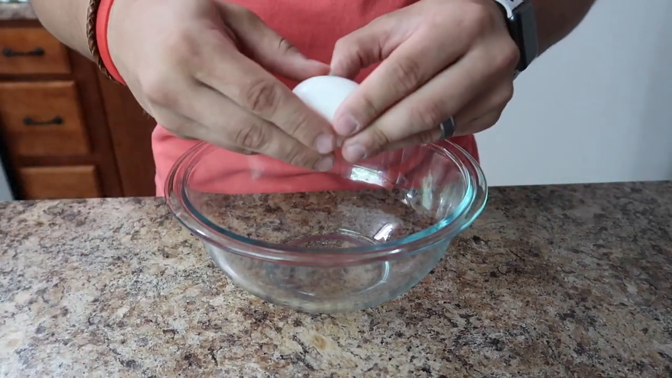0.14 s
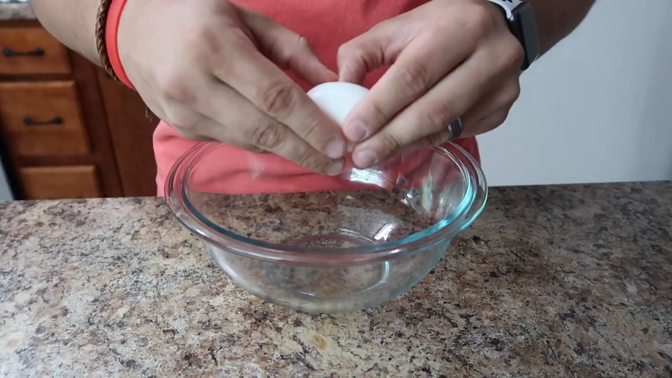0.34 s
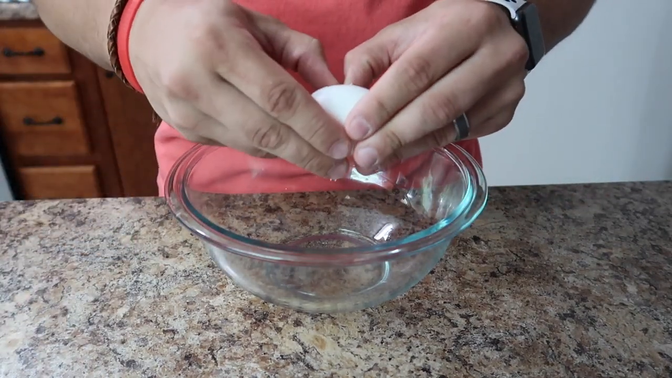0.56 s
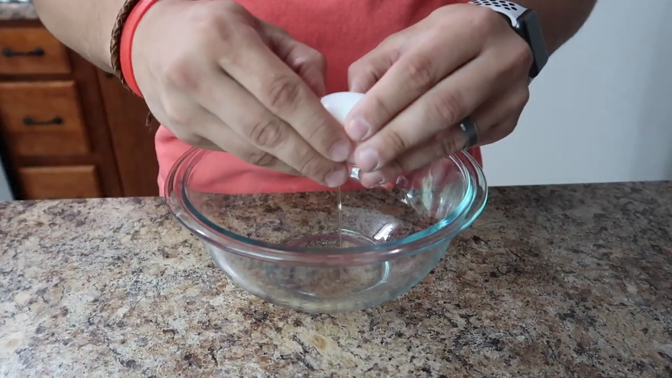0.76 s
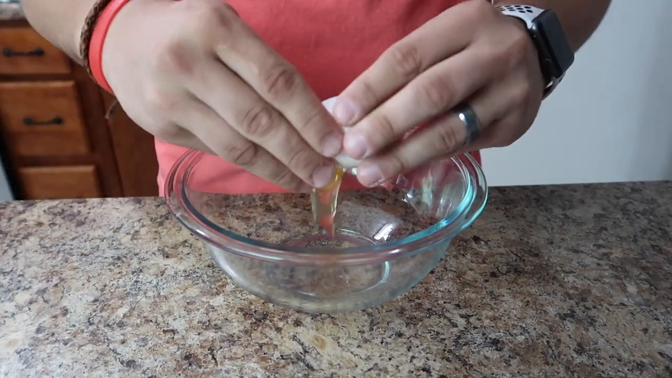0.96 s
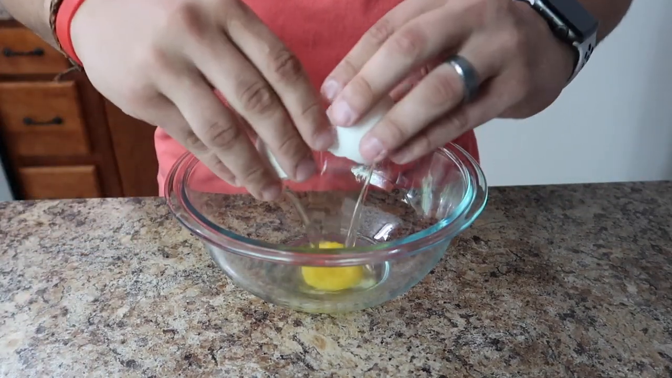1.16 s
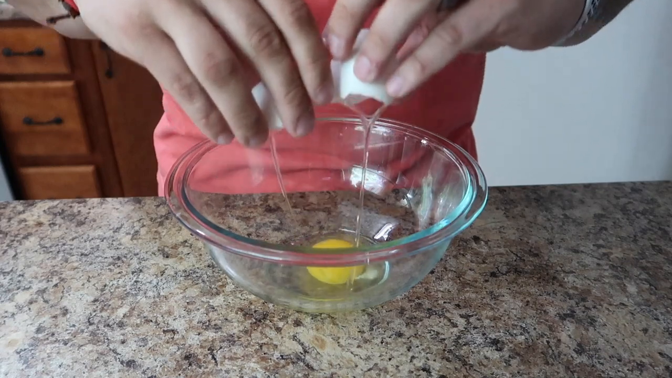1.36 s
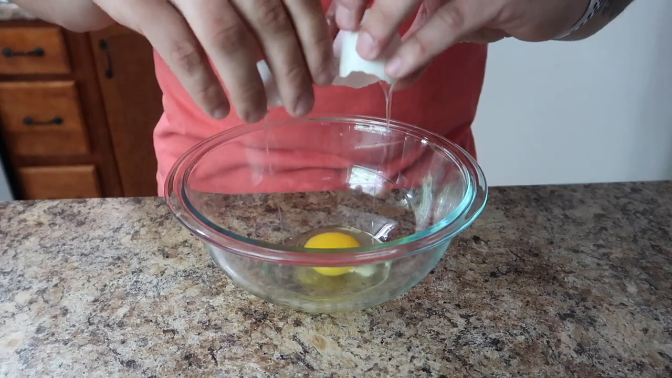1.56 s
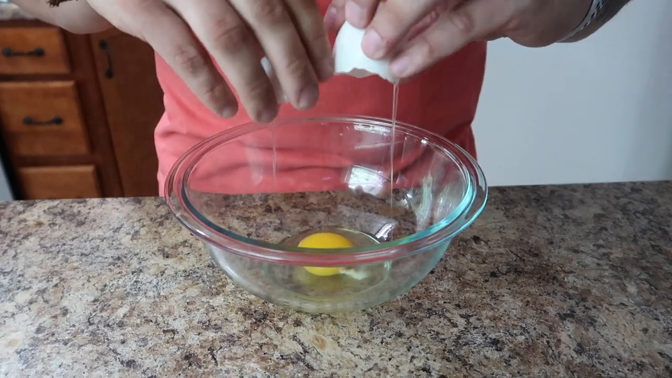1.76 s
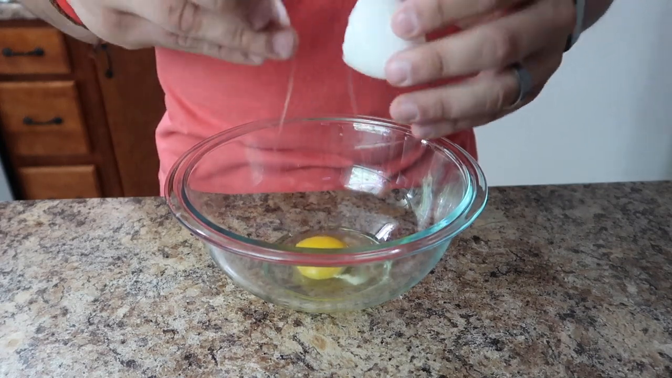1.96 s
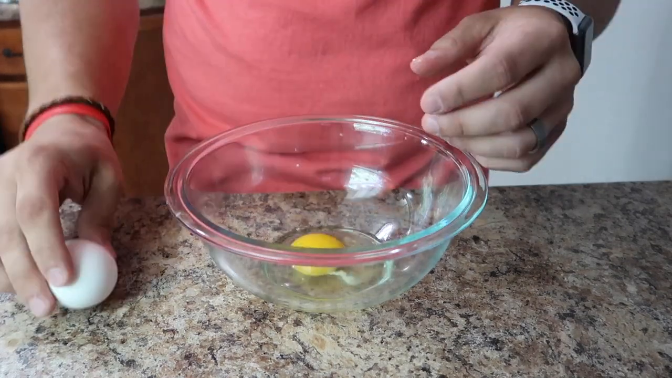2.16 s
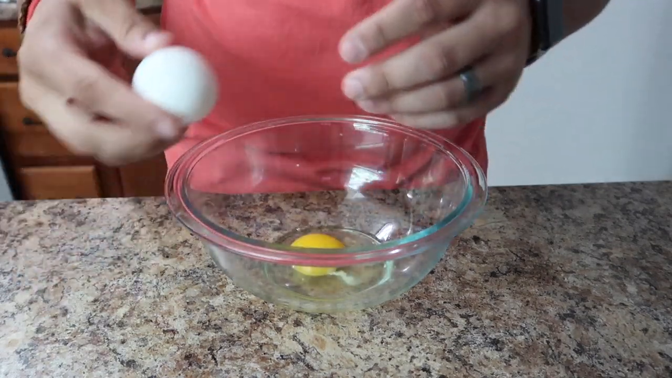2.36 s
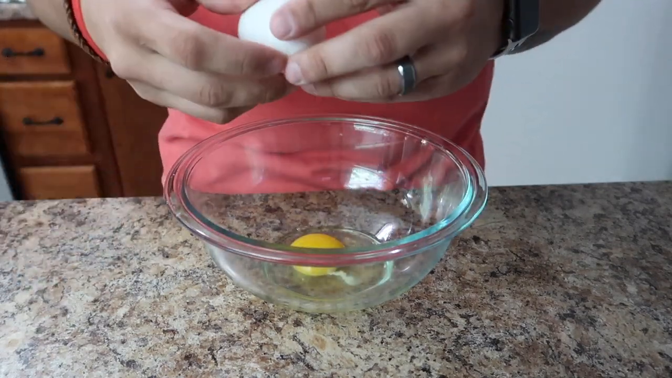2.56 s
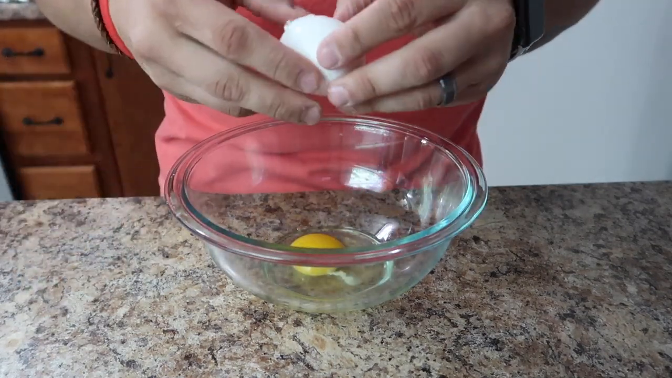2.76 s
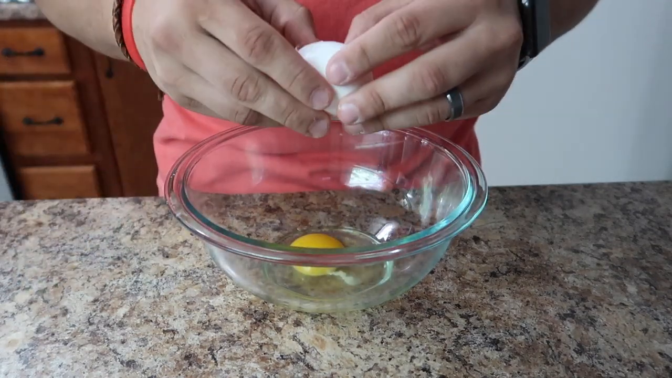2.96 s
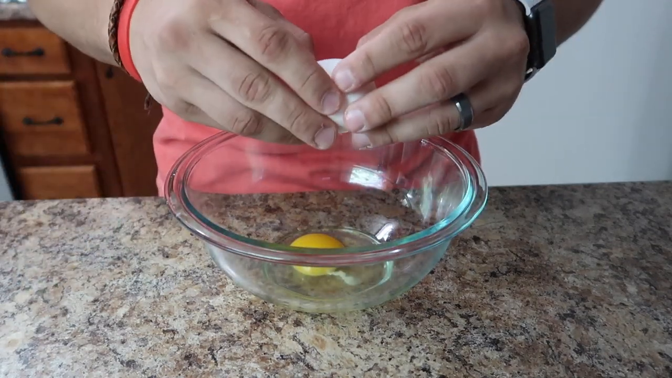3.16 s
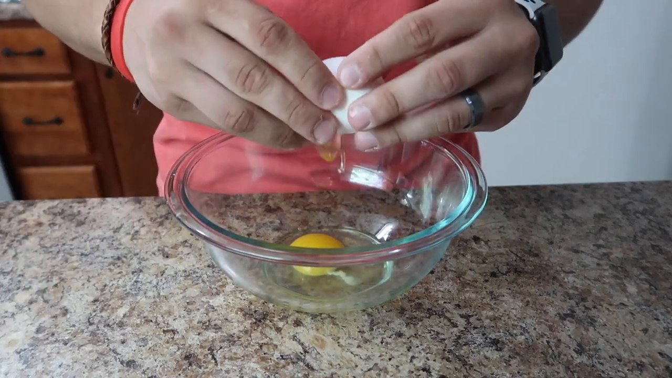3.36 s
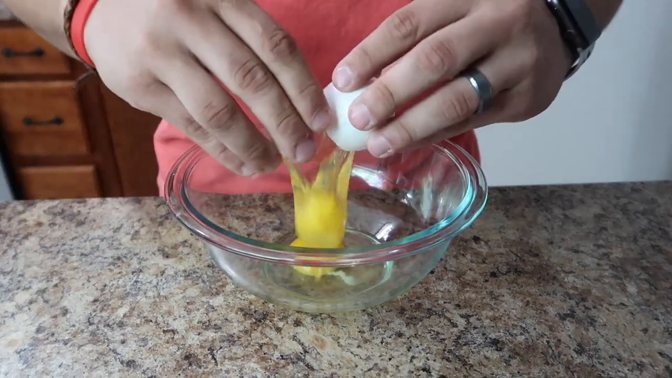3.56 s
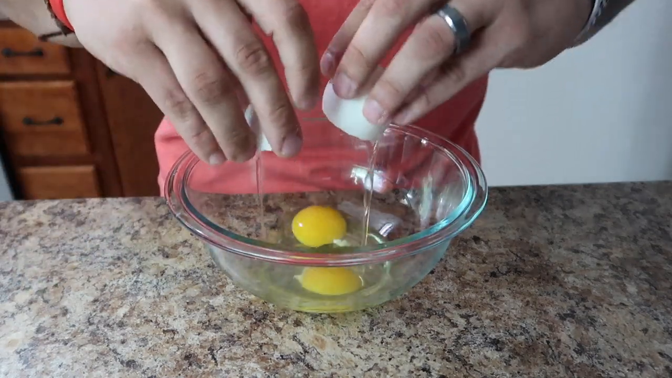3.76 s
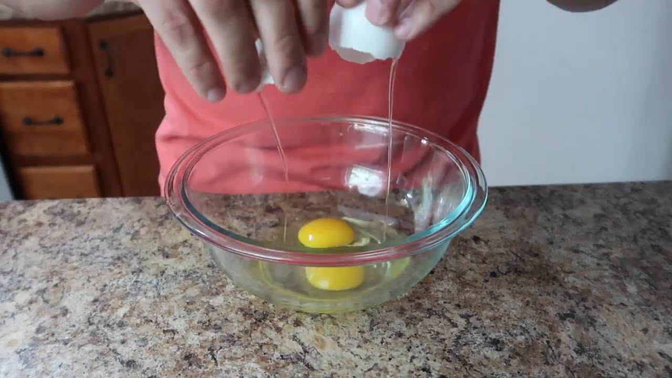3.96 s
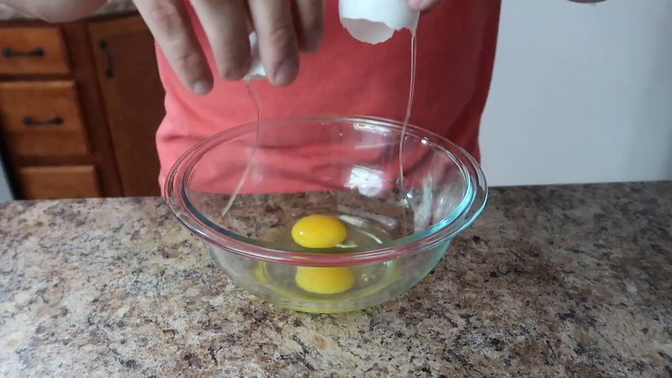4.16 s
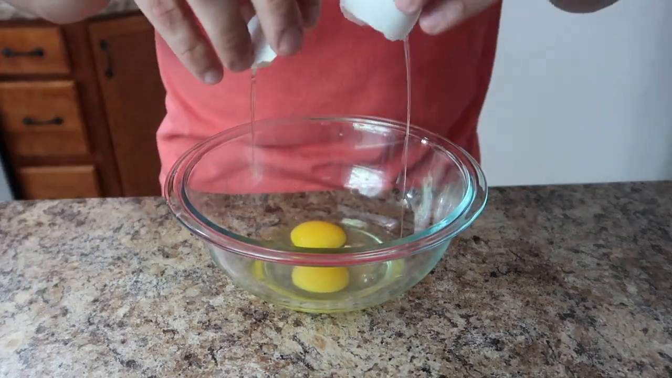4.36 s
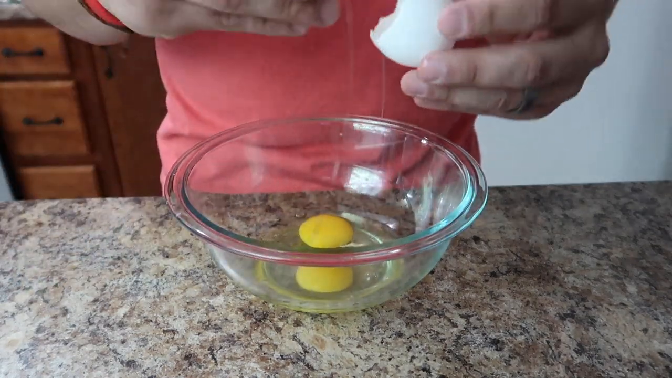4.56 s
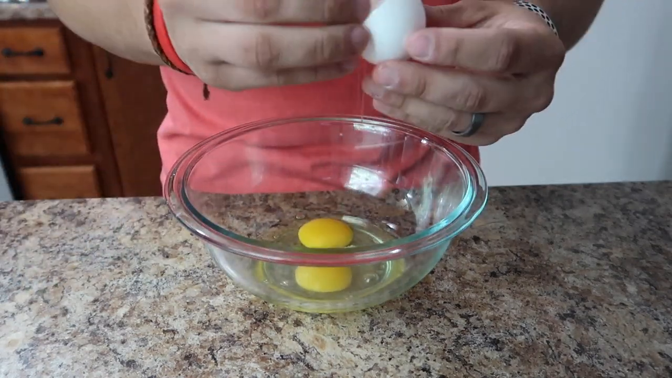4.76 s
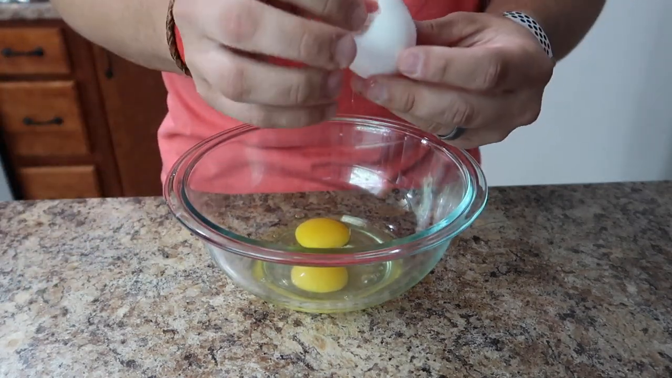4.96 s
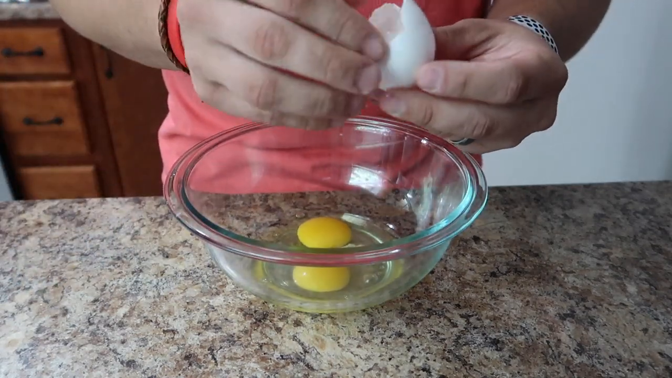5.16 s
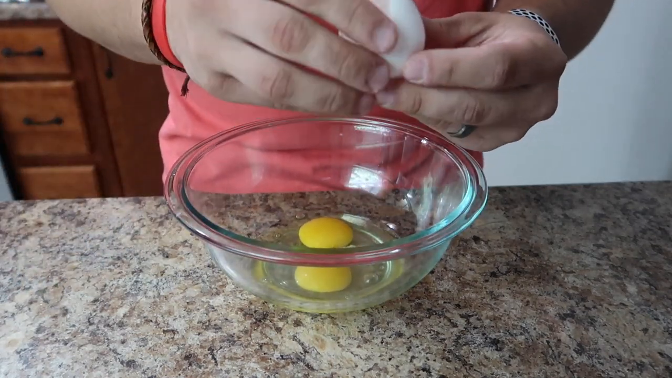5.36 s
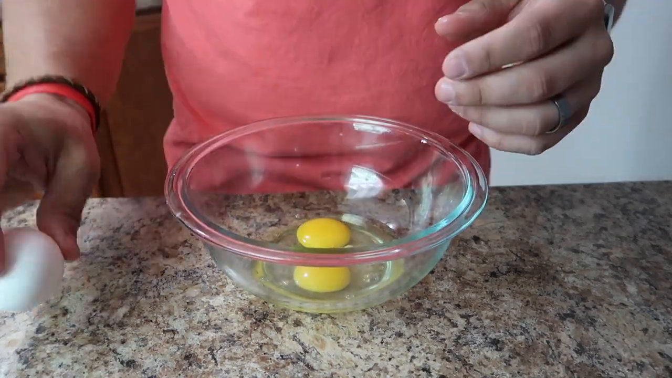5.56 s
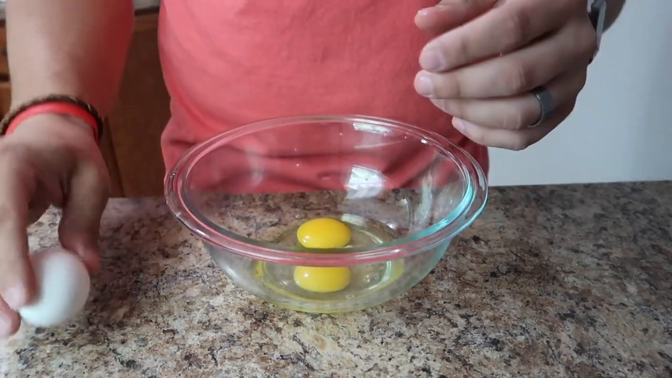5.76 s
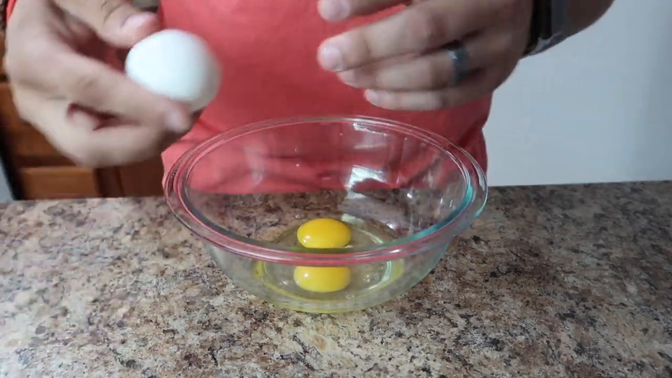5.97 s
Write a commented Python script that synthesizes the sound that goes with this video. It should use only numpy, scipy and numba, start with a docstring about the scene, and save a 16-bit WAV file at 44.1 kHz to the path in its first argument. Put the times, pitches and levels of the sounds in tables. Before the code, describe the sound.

A close phone microphone in a small kitchen picks up low refrigerator hum, beating slowly, and soft room noise. Faint shell ticks begin at once, with a clear snap near 0.45 s. From 0.7 to 1.25 s the shell grinds and cracks open in wet, hollow pops that ring in the glass bowl; a soft low yolk plop comes near 1.17 s. After near quiet, a loud, overloaded crunching knock on the stone counter hits at 2.2 s with a short rattle and tail. The following sounds seem turned down: small crackles from 2.6 to 3.4 s, a second dull plop around 3.7 s. The fridge motor winds down by 3.95 s, leaving steadier hum. Sparse ticks follow, then a sharp, loud snap at 4.8 s and dense gritty shell crunching to about 5.25 s, fading into light crackles. Another hard, brighter crunching knock lands at 5.77 s.

```python
"""Eggs are knocked on a stone counter, prised open and emptied into a glass bowl, close to a phone in a kitchen.
Shell snaps and grinds are noise grains and short tones ringing the hollow, the shell wall and the bowl air.
Knocks are noise crunches over counter modes, with a rattle; yolks plop as soft low tones.
A fridge hums in steady sine tones, beating with a motor that winds down, over room noise and a kitchen tail.
The phone overloads on the knocks, turns itself down and creeps back up."""
import sys
import numpy as np
from scipy import signal
from scipy.fft import rfft, irfft, next_fast_len
from scipy.io import wavfile
from scipy.ndimage import uniform_filter1d
from numba import njit

SR = 44100
rng = np.random.default_rng(int(sys.argv[2]) if len(sys.argv) > 2 else 0)


def int16_out(signal):
    """Quantize to a 16-bit WAV file."""
    q = np.round(np.clip(np.atleast_2d(signal).T, -1, 1) * 32767)
    wavfile.write(sys.argv[1], SR, q.astype(np.int16))


N = 265393

# modes of the air in the bowl: (frequency [Hz], relative level [dB], t60 [s])
BOWL_MODES = [(1346, 2.5, 0.069), (1397, -10, 0.08), (1860, -28, .05), (2146, -4, 0.022),
              (3500, -24, 0.012), (4950, -26.5, 0.035)]
# difference between the two ports: (frequency [Hz], side gain [dB])
PORT_SIDE = [(200, -28), (1400, -23), (2500, -15), (4000, -8.5), (8000, 0), (14000, 2.5)]


def undb(db):
    """Gain of a level in dB."""
    return 10 ** (np.asarray(db) / 20)


def fade(t60, secs):
    """Envelope falling 60 dB in t60 seconds, never faster than in 2 ms."""
    return np.exp(-np.log(1000) * np.arange(int(secs * SR)) / SR / max(t60, .002))


def colour(x, shape):
    """Filter by (Hz, dB) points joined on a log-frequency axis."""
    hz, db = np.transpose(shape)
    f = np.arange(x.shape[-1] // 2 + 1) * SR / x.shape[-1]
    gain = undb(np.interp(np.log(f + 1), np.log(hz), db))
    return irfft(rfft(x) * gain, x.shape[-1])


def unit(x):
    """Scale to rms 1."""
    return x / np.sqrt(np.mean(x ** 2))


def ring(modes, secs=.4):
    """Sum of dying sine modes (Hz, dB, t60)."""
    t = np.arange(int(secs * SR)) / SR
    return sum(undb(db) * np.sin(2 * np.pi * hz * t) * fade(t60, secs) for hz, db, t60 in modes)


def add(out, s, x):
    """Mix x into out from time s in seconds."""
    i = int(s * SR)
    out[i:i + len(x)] += x[:N - i]


def walk(rate):
    """Slow random wander with spread near 1, from new random steps at the given rate in Hz."""
    k = int(SR / rate)
    steps = np.repeat(rng.standard_normal(N // k + 1), k)
    return 1.45 * uniform_filter1d(uniform_filter1d(steps, k), k)[:N]


def grit(rate, scatter_db):
    """Random tiny fractures, about rate per second, of scattered size and random sign, rms 1."""
    hit, size, sign = rng.random((3, N))
    height = undb(-scatter_db * np.log(size + 1e-9))
    return unit((hit < rate / SR) * height * np.sign(sign - .5))


@njit
def svf(x, hz, q):
    """State-variable band-pass with a moving centre, gain 1 there."""
    y, b, l = np.empty(len(x)), 0., 0.
    for i in range(len(x)):
        g = np.tan(np.pi * hz[i] / SR)
        v = (b + g * (x[i] - l)) / (1 + g * (g + 1 / q))
        b, l, y[i] = 2 * v - b, l + 2 * g * v, v / q
    return y


@njit
def duck(over_db, attack, release_db):
    """Gain cut in dB: follows the excess quickly, lets go at a steady rate."""
    cut, c = np.empty(len(over_db)), 0.
    for i in range(len(over_db)):
        c = c + attack * (over_db[i] - c) if over_db[i] > c else max(c - release_db, 0.)
        cut[i] = c
    return cut


def fridge():
    """A steady-pitched hum; a slower motor beats against it and buzzes at its octave; two thin tones waver in level."""
    # motor winding down: (time [s], rms level [dB], rms level of its octave [dB] before wander)
    motor_levels = [(0, -35, -58.5), (.9, -38.5, -50.5), (1.6, -37.5, -47.5), (2.199, -38, -45.5),
                    (3.55, -43.5, -49), (3.78, -50, -62), (3.95, -63.5, -75)]
    # moments when motor and hum are in opposition: (time [s])
    beat_times = [-.01, .37, .77, 1.15, 1.595, 2.09, 2.46, 2.88, 3.31, 3.63, 3.78, 3.87, 3.94]
    # thin tones: (frequency [Hz], rms level [dB] before wander)
    whine_tones = [(317.6, -55), (479.1, -56.5)]
    t = np.arange(N) / SR
    hum_phase = 2 * np.pi * 118.45 * t
    # the motor falls one cycle behind the hum from each beat to the next
    cycles_behind = np.interp(t, beat_times, np.arange(len(beat_times)))
    motor_phase = hum_phase - 2 * np.pi * uniform_filter1d(cycles_behind, size=4000, mode="nearest")
    s, db, octave_db = np.transpose(motor_levels)
    hum = undb(-41.5 + 2.0 * walk(6)) * np.sin(hum_phase)
    motor = undb(np.interp(t, s, db)) * np.sin(motor_phase)
    octave = undb(np.interp(t, s, octave_db) + 2.2 * walk(7.7)) * np.sin(2 * motor_phase)
    whine = sum(undb(d + 2 * walk(5)) * np.sin(2 * np.pi * f * t) for f, d in whine_tones)
    return np.sqrt(2) * (hum - motor + octave + whine)  # rms to peak


def air():
    """Room noise, alike at both ports in the bass and unrelated in the treble."""
    # spectrum of the noise: (frequency [Hz], relative level [dB])
    air_spectrum = [(12, -66), (20, -13.5), (85, -11.5), (148, -11.5), (237, -11), (391, -15), (450, -23),
                    (700, -25), (1000, -31), (1900, -34.5), (2300, -39), (5000, -46), (12600, -57),
                    (15300, -83)]
    # width of the noise: (frequency [Hz], side minus mid [dB])
    air_width = [(100, -36.5), (350, -11.5), (1100, -5.5), (2500, -1.5), (12000, 1.5)]
    mid, side = colour(rng.standard_normal((2, N)), air_spectrum)
    level = undb(-43 + 0.32 * walk(7.5))  # mid rms, wandering slightly
    scale = level / np.sqrt(np.mean(mid ** 2))
    return scale * (mid + np.outer([1, -1], colour(side, air_width)))


def wall(x):
    """Ring x through the broad modes of the shell wall, each applied twice for dark valleys."""
    # shell wall modes: (centre [Hz], width [Hz], relative level [dB])
    wall_modes = [(2048, 1150, 0), (3410, 840, -3.5), (5040, 1240, -4), (6180, 460, -5.5),
                  (7800, 2800, -11), (10730, 4800, -24.5)]
    out = 0
    for hz, width, db in wall_modes:
        centre, q = np.full(N, 1. * hz), 0.71 * hz / width
        out = out + undb(db) * svf(svf(x, centre, q), centre, q)
    return unit(out)


def snaps():
    """Each fracture swells in the hollow shell and the bowl air, scratches the wall and sprays a fine hiss."""
    # shell snaps and wet ticks: (time [s], relative level [dB], mean pitch of the hollow [Hz],
    # ring length to -60 dB [s], relative crackle level [dB], relative hiss level [dB])
    snap_events = [(0.019, -51.5, 1450, 0.034, -8.5, -9), (0.046, -27.5, 1450, 0.0099, -14.5, -34),
                   (0.284, -44, 1440, .025, -22, -28), (0.4522, -24.5, 2840, 0.0074, -30, -10.5),
                   (0.4562, -16, 1675, 0.0072, -31, -34), (0.511, -50.5, 1510, .023, -22, -2.5),
                   (0.574, -42.5, 1630, 0.019, -31, -34), (0.644, -46, 5440, .025, -19, -10),
                   (0.657, -42, 3660, 0.044, -22, -19), (0.679, -28, 3460, 0.014, -34, -27),
                   (0.7205, -41, 2230, 0.023, -13, -19), (0.744, -47, 5420, 0.019, -14, -34),
                   (0.769, -32, 1750, .017, -25, -36), (0.809, -36.5, 1900, 0.085, -37, -39),
                   (0.8265, -29.5, 1640, 0.017, -25, -35), (0.8374, -33, 1720, .022, -37, -15),
                   (0.9013, -11.5, 1840, 0.026, -18.5, -40), (0.926, -9, 1630, 0.017, -28, -40),
                   (0.9951, -8.5, 1360, 0.021, -35.5, -45), (1.019, -24, 4510, .025, -21, -22.5),
                   (1.069, -28, 1436, .02, -28, -41), (1.0895, -23.5, 1415, .02, -29, -53),
                   (1.1774, -35, 4810, 0.026, -36, -9), (1.201, -43.5, 3120, 0.058, -13, -15),
                   (1.2429, -9.5, 1382, 0.044, -34, -63), (1.488, -49.5, 5370, 0.027, -31, -12),
                   (1.9713, -46, 2770, 0.035, -7, -9.5), (2.618, -42.5, 1354, 0.016, -19, -9.5),
                   (2.7384, -39, 2180, 0.017, -18.5, -34), (2.789, -31.5, 1380, 0.016, -18.5, -47),
                   (2.817, -41.5, 1360, 0.02, -5, -9), (2.863, -21.5, 2225, 0.013, -14, -37),
                   (2.917, -40.5, 2220, .02, -21, -25), (3.028, -35.5, 2080, .016, -9.5, -23),
                   (3.065, -28, 1440, 0.025, -17, -41), (3.0867, -31, 1330, 0.013, -29, -22),
                   (3.097, -24, 1420, 0.027, -18, -30), (3.105, -28, 1300, .017, -27, -22),
                   (3.127, -38, 1340, .023, -19, -14), (3.2879, -42, 2210, .03, -34, -15),
                   (3.3474, -32.5, 1370, 0.023, -21, -26), (3.378, -53, 1750, .025, -7, 3),
                   (3.4105, -18, 3164, 0.022, -10, -19), (3.595, -37, 1313, 0.02, -17, -26),
                   (3.705, -46.5, 1360, .023, -25, -6.5), (3.7472, -26, 2920, 0.015, -22, -37),
                   (3.837, -34.5, 4500, 0.027, -21, -26), (3.981, -40, 1820, .02, -14, -12),
                   (4.19, -55, 2880, .02, -8, -15), (4.489, -56.5, 1280, .018, -25, -6),
                   (4.6122, -26, 2930, 0.016, -12, -15.5), (4.702, -51.5, 1370, .018, -6, -13.5),
                   (4.8032, 7, 1806, 0.018, -21, -50.5), (4.815, -21.5, 1760, .015, -23.5, -40),
                   (4.841, -10.5, 1770, 0.021, -27, -42), (4.8474, -9.5, 1730, 0.034, -20.5, -53),
                   (4.86, -13, 1795, 0.038, -16, -45), (4.877, -18, 1810, .018, -12, -43),
                   (4.908, -13, 1470, .014, -26, -44), (5.008, -23.5, 2035, 0.066, -14, -32),
                   (5.027, -11, 1616, 0.014, -19.5, -32.5), (5.055, -10, 1450, .024, -18.5, -37),
                   (5.1038, -30, 1380, 0.018, -25, -33), (5.1493, -26, 1354, 0.025, -11, -45),
                   (5.1568, -24, 1430, 0.015, -14, -39.5), (5.183, -48, 1360, .025, -2, -28),
                   (5.229, -23.5, 1427, 0.017, -35, -28), (5.2566, -32, 1400, .017, -19, -28),
                   (5.453, -31, 1450, 0.03, -24, -37), (5.462, -30.5, 1370, 0.023, -13.5, -18.5),
                   (5.4884, -34, 1340, .025, -16, -29), (5.5002, -26, 1365, 0.021, -21, -35),
                   (5.556, -23, 1404, 0.014, -27.5, -47), (5.586, -41, 1335, 0.043, -26, -41.5)]
    # spectrum of the hiss: (frequency [Hz], relative level [dB])
    hiss_spectrum = [(900, -18), (2000, -17.5), (4000, -2.5), (7000, -7.5), (11000, -7.5), (15500, -22)]
    flutter_depth, lowest_crackle_hz, crackle_t60 = 0.018, 3100, 0.043  # share of pitch, Hz, s
    out, t = np.zeros(N), np.arange(int(.4 * SR)) / SR
    bowl = undb(-15) * ring(BOWL_MODES)
    tiny = grit(15000, 2.4)
    spray = unit(colour(tiny, hiss_spectrum))
    scratch = wall(tiny) + undb(2) * tiny
    swell = 1 - np.exp(-(t / 0.0013) ** 2)
    flutter = np.tile(walk(700), 2)
    for s, db, hz, length, crackle_db, hiss_db in snap_events:
        i = int(s * SR)
        # the wet hollow flutters in size while it rings, small high ones most
        depth = flutter_depth + .02 * (hz / 3000) ** 2
        phase = 2 * np.pi * np.cumsum(hz * (1 + depth * flutter[i:i + len(t)])) / SR
        choke = np.exp(-np.log(1000) * (t / length) ** 2.45)  # fingers choke the ring off
        hollow = choke * (np.sin(phase) + undb(-18) * np.sin(0.96 * phase)) + bowl
        add(out, s, undb(db - 4) * swell * hollow)
        centre = max(lowest_crackle_hz, hz)  # small chips crackle at their own high pitch
        peak = [(centre / 19.0, -20), (centre, 0), (centre * 1.24, -4), (centre * 3.5, -22)]
        crackle = undb(crackle_db) * unit(colour(scratch[i:i + 4096], peak))
        puff = crackle + undb(hiss_db) * spray[i:i + 4096]
        add(out, s, undb(db + 8.5) * puff * (swell * fade(crackle_t60, .4))[:4096])
    return out


def grind():
    """Dense slips of shell on shell, through the changing hollow, the shell wall and the bowl."""
    # strokes: (peak time [s], level of hollow and bowl mix [dB], mean pitch of the hollow [Hz],
    # rasp gain [dB], swell time over 20 dB [s], decay time over 20 dB [s])
    grind_strokes = [(.72, -70, 2220, 12.5, 0.086, 0.091), (.82, -46, 1850, -8, .1, 0.057),
                     (.875, -52, 2210, -5, .04, 0.025), (.945, -36, 1640, -12, .035, 0.064),
                     (1.1, -44, 1440, -10.5, 0.31, 0.12), (2.821, -46, 1580, -2.5, 0.054, 0.21),
                     (3.07, -45, 1440, -8, 0.042, 0.24), (3.36, -52, 1520, -5, 0.18, 0.57),
                     (3.62, -61, 1420, -5, 0.13, 0.043), (4.78, -58, 1780, 6, .05, 0.045),
                     (4.865, -25, 1700, -5, .035, 0.071), (4.98, -43, 1890, -2, .08, 0.044),
                     (5.05, -19, 1520, -10.5, 0.059, 0.031), (5.169, -53, 1487, 7, 0.21, 0.15),
                     (5.442, -44.5, 1477, -16, 0.015, 0.29)]
    out, t = np.zeros(N), np.arange(N) / SR
    slips = grit(2500, 1.78) * undb(5.4 * walk(70))
    rasp = wall(slips)
    bowl = unit(signal.fftconvolve(slips, ring(BOWL_MODES))[:N])
    rows = np.array(grind_strokes)
    pitch = np.interp(t, rows[:, 0], rows[:, 2])
    hz = np.clip(pitch * (1 + 0.04 * walk(50)), 500, 5000)
    hollow = unit(svf(svf(slips, hz, 3.), hz, 3.)) + undb(-2) * bowl
    for s, db, _, rasp_db, swell, decay in grind_strokes:
        stroke = undb(db - 20 * np.maximum((s - t) / swell, (t - s) / decay) ** 1.2)
        out += stroke * (hollow + undb(rasp_db) * rasp)
    return out


def plops():
    """Yolk landing in the bowl: two low dying tones with a soft 10 ms onset."""
    # landings: (time [s], level of the upper tone [dB], its frequency [Hz], t60 [s])
    yolk_landings = [(1.17, -33, 105.8, 0.2), (3.71, -35.5, 113.5, 0.11)]
    out = np.zeros(N)
    onset = np.clip(np.arange(int(.4 * SR)) / (0.01 * SR), 0, 1)
    for s, db, hz, t60 in yolk_landings:
        add(out, s, ring([(hz, db, t60), (0.52 * hz, db + 6, t60)]) * onset)
    return out


def knocks():
    """The shell caves in with a noise crunch; the counter rings faintly, then thuds in opposite phase and rattles."""
    # knocks on the counter, the last with a faint short noise just before it:
    # (time [s], thud level [dB], crunch level [dB], crunch centre [Hz],
    # centre lift [dB], cave-in time [s], crunch t60 [s], rattle level [dB])
    knock_events = [(2.2147, 3, 2, 1503, 2.5, 0.0041, 0.035, -17.5),
                    (5.7556, -54.5, -37, 2255, -1, 0.0014, 0.056, -58),
                    (5.772, 2.5, 4.5, 2400, 5.5, 0.00582, 0.028, -12.5)]
    # counter modes: (frequency [Hz], relative level [dB], t60 [s])
    counter_modes = [(125.2, -2, 0.15), (149.2, -11.5, 0.2), (279, 7.5, 0.036), (323.7, -3, 0.074),
                     (596, -17.5, 0.025), (1057, -17, 0.044), (1450, -19.5, 0.041), (2180, -27.5, 0.015)]
    # spectrum of the crunch: (frequency [Hz], relative level [dB])
    crunch_spectrum = [(290, -31.5), (550, -3.5), (800, -10.5), (1150, -3.5), (2820, -9.5), (3650, -17),
                       (5690, -19.5), (6290, -14.5), (6960, -17), (10500, -24), (12900, -23.5),
                       (15300, -35.5)]
    # spectrum of things shaking on the counter: (frequency [Hz], relative level [dB])
    rattle_spectrum = [(700, -22.5), (1100, 4), (1500, -4.5), (2000, -12), (2700, 0), (3300, -16),
                       (7000, -28), (12000, -35)]
    out, t = np.zeros(N), np.arange(int(.2 * SR)) / SR
    thud = ring(counter_modes)
    for s, db, crunch_db, hz, lift_db, cave, t60, rattle_db in knock_events:
        add(out, s, undb(db - 14.5) * thud)  # faint first ring
        add(out, s + 0.5917 * cave, -undb(db) * thud)
        noise = colour(rng.standard_normal(len(t)), crunch_spectrum)
        noise = colour(noise, [(hz / 6.7, 0), (hz, lift_db), (hz * 2, 0)])
        # full strength during the cave-in, then dying away
        cave_in = np.clip(t / 0.00009, 0, 1) * np.exp(-np.log(1000) * np.maximum(t - cave, 0) / t60)
        add(out, s, undb(crunch_db) * unit(noise) * cave_in)
        rattle = unit(colour(rng.standard_normal(len(t)), rattle_spectrum))
        rattle = rattle * undb(1.6 * walk(90)[:len(t)])  # uneven shaking
        add(out, s + cave, undb(rattle_db) * rattle * fade(0.15, .2))
    return out


def room(x):
    """Kitchen tail as mid and side: noise bands dying at their own rates."""
    # tail bands: (centre [Hz], relative level [dB], t60 [s])
    tail_bands = [(204, -21.5, 0.71), (510, -11, .3), (1210, -12, 0.35), (2260, -10.5, 0.31),
                  (4640, -8.5, 0.27), (10800, -7, 0.091)]
    tail = 0
    for hz, db, t60 in tail_bands:
        shape = [(hz / 3, -30), (hz / 1.275, 0), (hz * 1.304, 0), (hz * 3, -30)]
        band = colour(rng.standard_normal((2, SR // 2)), shape)
        # longer tails are scaled down to even out their energy
        tail = tail + undb(db) * band * fade(t60, .5) / np.sqrt(0.079 * t60 * SR)
    tail = tail * np.clip(np.arange(SR // 2) / (0.0061 * SR), 0, 1)  # builds up over 6.1 ms
    mid, side = signal.fftconvolve(x[None], tail, axes=1)[:, :N]
    return mid + np.outer([1, -1], undb(3) * colour(side, PORT_SIDE))


def scene():
    """Knocks lean to one port and hands to the other by a quarter-turn side signal that grows in the treble."""
    hands = snaps() + grind()
    counter = knocks() + plops()
    lean = undb(3.0) * counter - undb(-5.0) * hands
    quarter_turn = signal.hilbert(lean, next_fast_len(N)).imag[:N]
    # nearby surfaces scatter the sound unevenly to the two ports
    scatter = rng.standard_normal(int(.01 * SR)) * fade(0.016, .01)
    scatter = scatter / np.sqrt(np.sum(scatter ** 2))
    uneven = signal.fftconvolve(hands + counter, scatter)[:N]
    side = colour(quarter_turn + undb(-7.0) * uneven, PORT_SIDE)
    direct = hands + counter + np.outer([1, -1], side)
    return direct + room(undb(-1.5) * hands + counter) + fridge() + air()


def record(dry):
    """Gain control that is too slow for the knocks, overload, a rumble filter and the top cut."""
    loud_db = 10 * np.log10(uniform_filter1d(np.mean(dry ** 2, axis=0), size=220) + 1e-12)
    over_db = 0.72 * np.maximum(loud_db + 16, 0)  # wanted cut above -16 dB
    cut_db = duck(over_db, 1 / (0.0083 * SR), 8.5 / SR)  # 8.3 ms attack, 8.5 dB/s release
    clipped = np.clip(dry * undb(-cut_db), -.97, .97)
    firm = signal.sosfilt(signal.butter(1, 25., "high", fs=SR, output="sos"), clipped)
    top_cut = signal.ellip(8, .2, 70, 15300, fs=SR, output="sos")
    return np.clip(signal.sosfilt(top_cut, firm), -1, 1)


dry = scene()
out = record(dry)
int16_out(out)
```